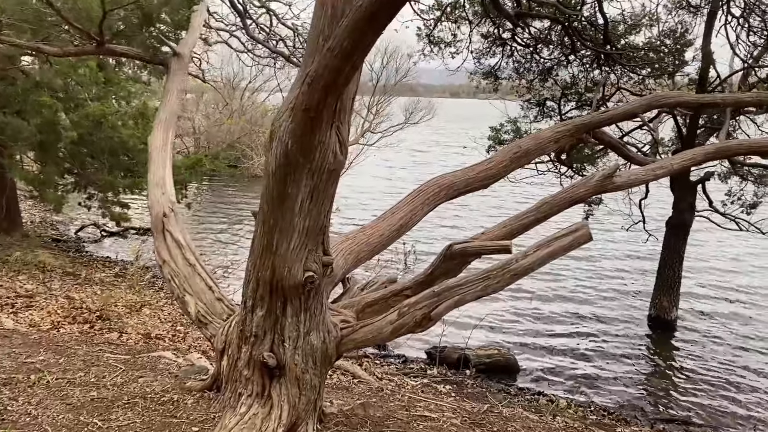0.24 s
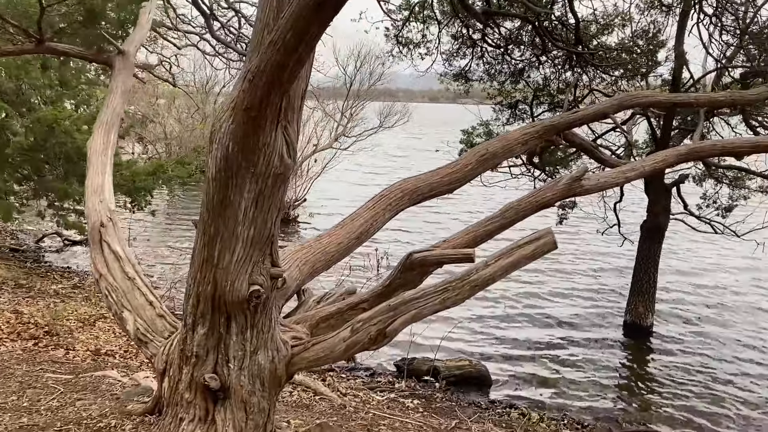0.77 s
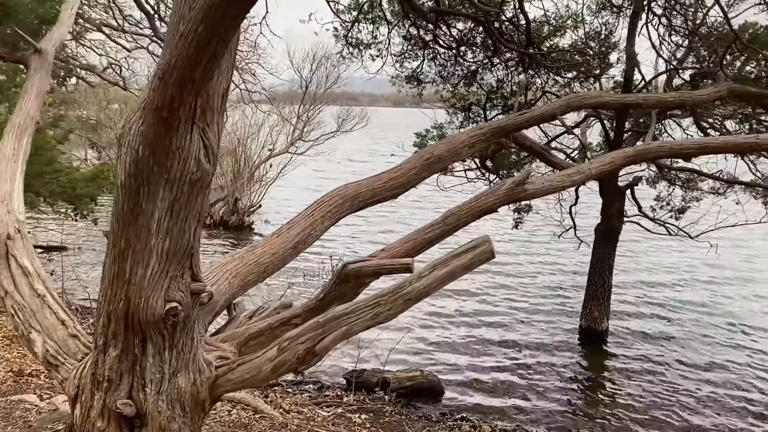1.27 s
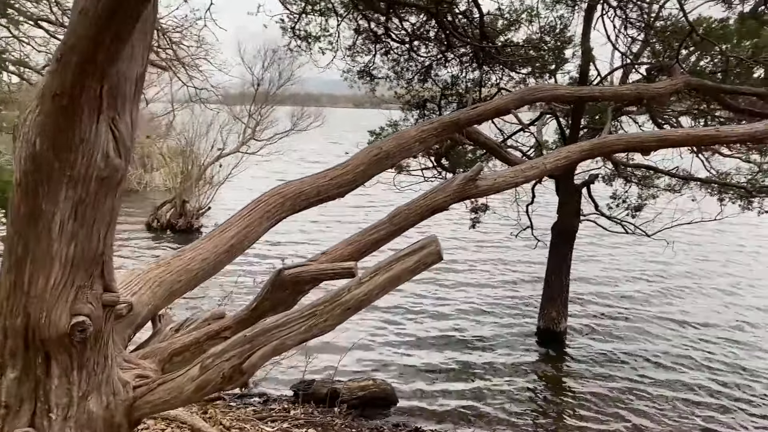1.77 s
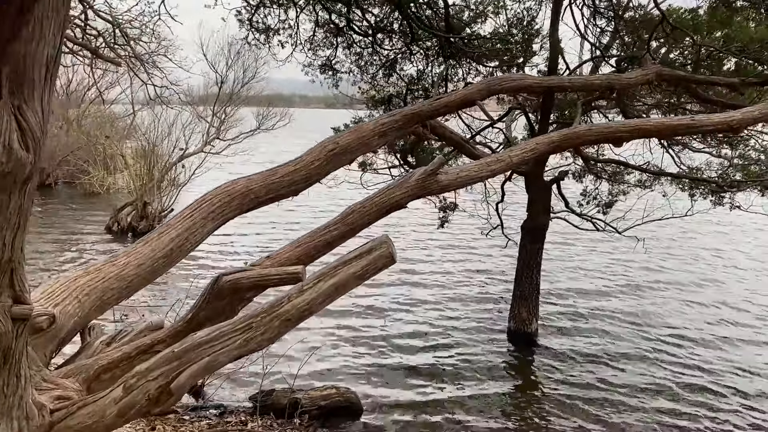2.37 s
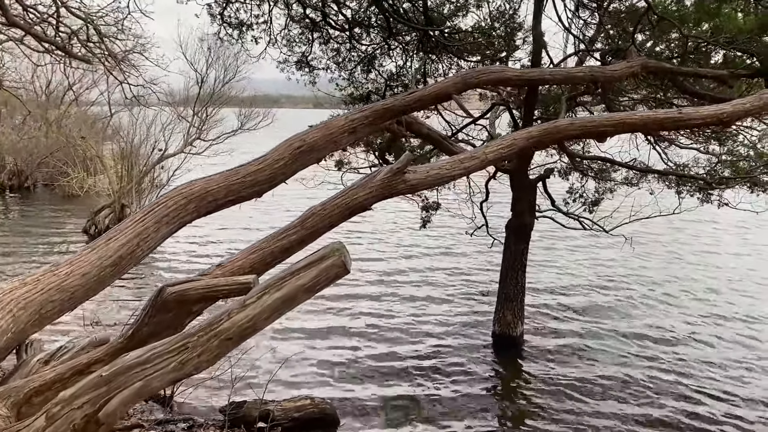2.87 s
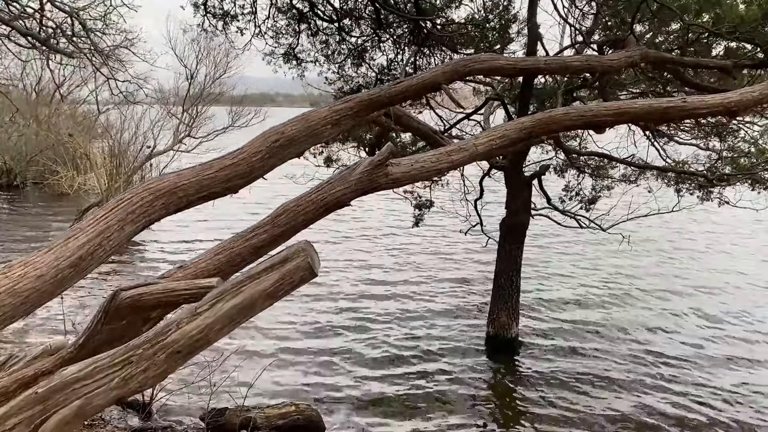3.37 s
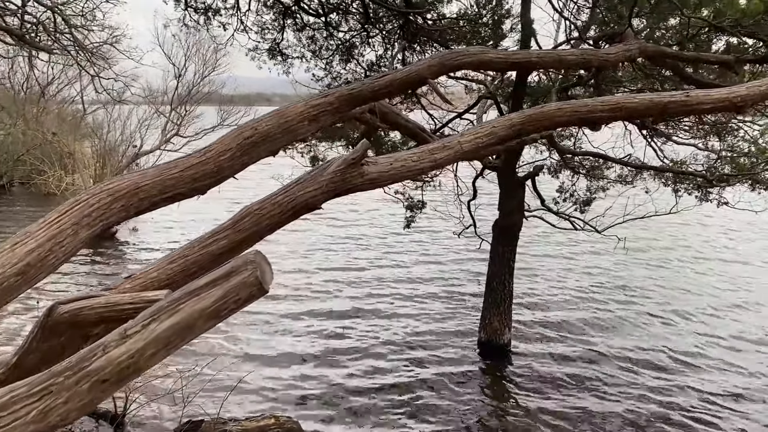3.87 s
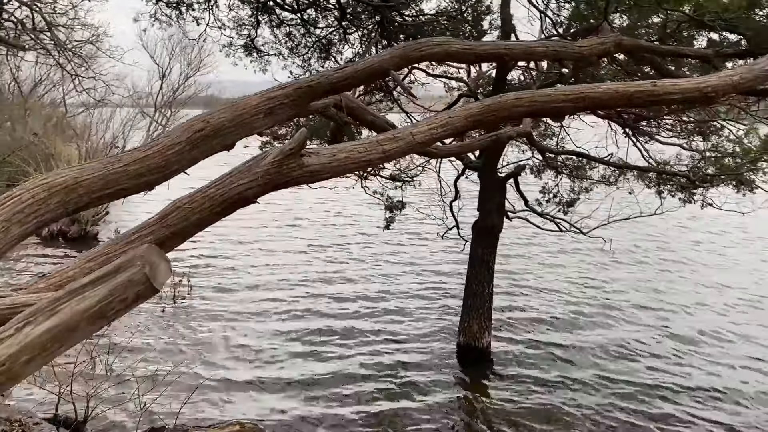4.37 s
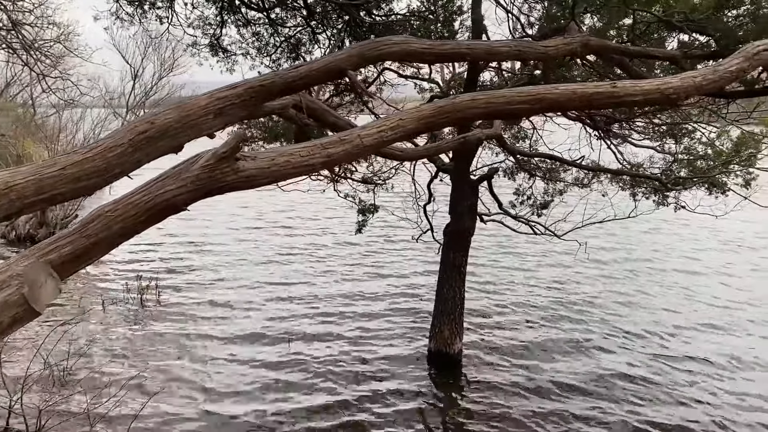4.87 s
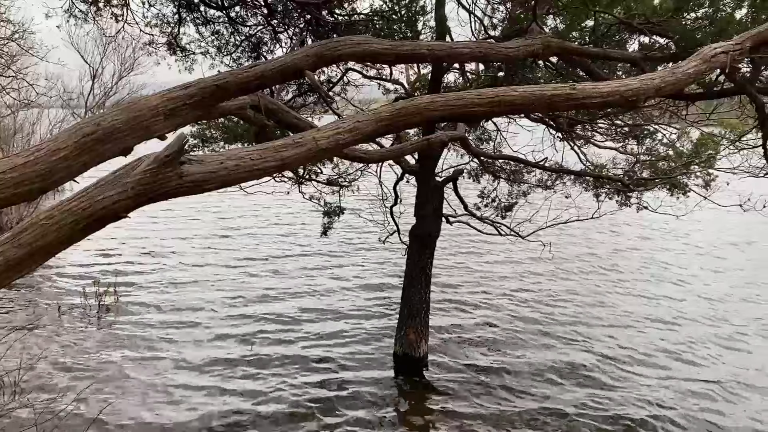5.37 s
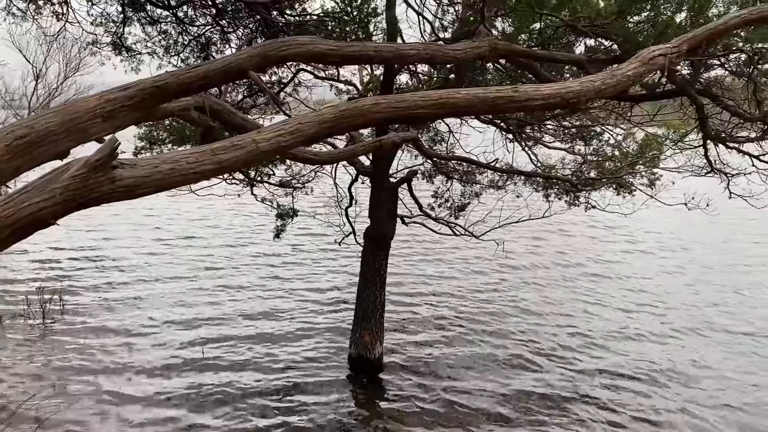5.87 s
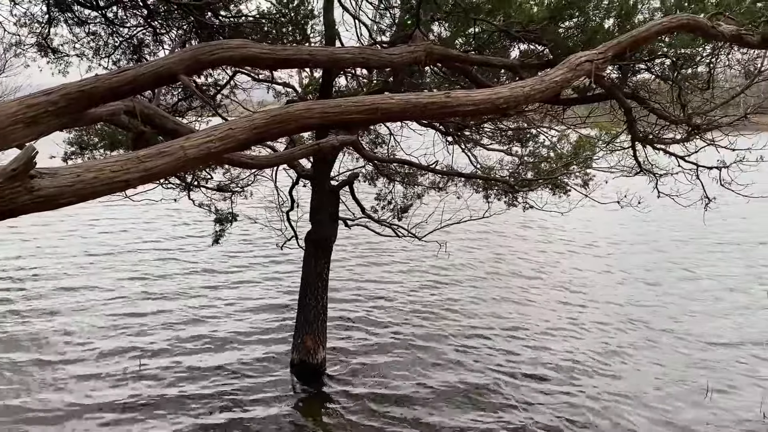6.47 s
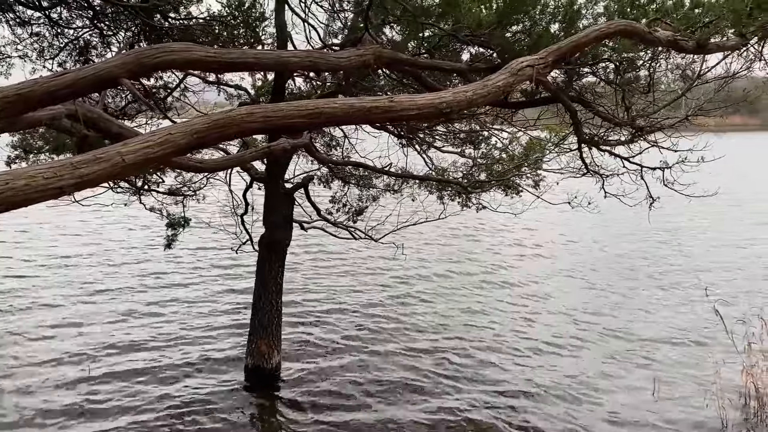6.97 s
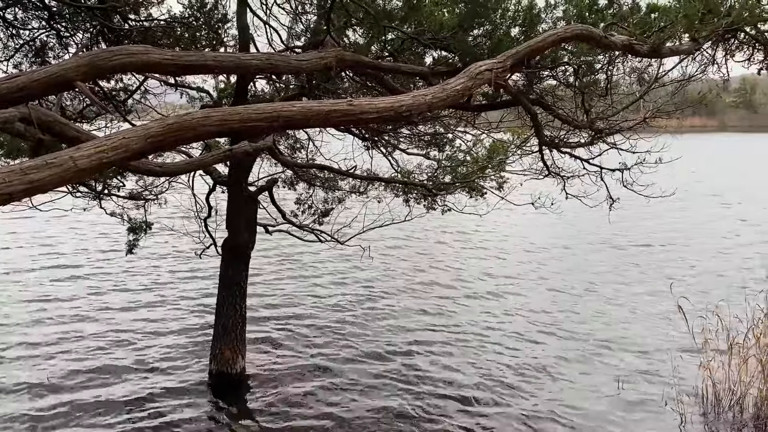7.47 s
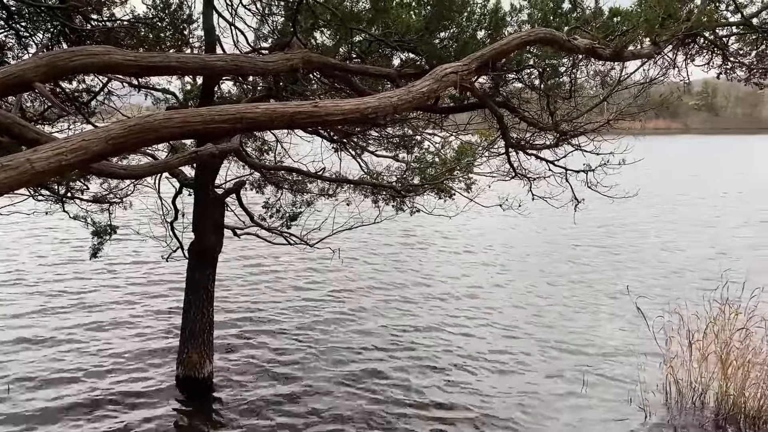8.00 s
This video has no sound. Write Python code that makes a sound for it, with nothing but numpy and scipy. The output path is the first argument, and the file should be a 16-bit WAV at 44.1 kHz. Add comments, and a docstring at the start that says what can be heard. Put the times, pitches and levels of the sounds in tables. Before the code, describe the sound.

Small songbirds sing on a lake shore for the whole eight seconds or so. High whistles, quick rising notes and falling chips overlap with a short woodland echo, above a blurred distant chorus and a soft, steady hiss of leaves and ripples. From about 0.6 to 1.9 seconds, gusts buffet the microphone with low rumbles, thuds and puffs, the loudest sounds here, peaking near 1.5 seconds. Dry leaves and twigs crackle lightly in the first two seconds, then again around 4 to 5, 6.3 and 8 seconds. From about 3.5 to 5 seconds, one bird sings a louder lilting phrase four times as the wind returns, somewhat weaker. Another small gust bumps near 6 seconds. Little waves gurgle quietly at the bank now and then, mostly near 4 and 6 seconds. The birds keep chirping to the end.

```python
"""Songbirds on a lake shore. From the start, whistles, rising whips and falling chips overlap, each a near
sine from the syrinx, over a far chorus blurred by the wood and a hiss of leaves and ripples. In the first
two seconds gusts buffet the microphone ports and dry litter crackles. From about 3.5 s a louder lilt is
sung four times as the wind returns. Wavelets gurgle, most near 4 s and 6 s, and the birds sing to the end."""
import sys
import numpy as np
from scipy import signal
from scipy.fft import rfft, irfft, next_fast_len
from scipy.io import wavfile
from scipy.ndimage import uniform_filter1d

SR = 44100
rng = np.random.default_rng(int(sys.argv[2]) if len(sys.argv) > 2 else 0)


def log_audio(samples):
    """Write samples as a 16-bit WAV file to the path given in sys.argv[1]."""
    # one column per channel
    frames = np.atleast_2d(samples).T
    # limit to full scale, then quantise
    limited = np.clip(frames, -1, 1)
    pcm = np.round(limited * 32767).astype(np.int16)
    wavfile.write(sys.argv[1], SR, pcm)


N = 363384

# Kinds of note: crest_fraction (of the length), sag_db (per note length), hook_hz, hook_fade_db
NOTE_KINDS = {"whistle": (0.42, 10, 27, 0), "slide": (0.8, 15, 28, 0), "whip": (0.83, 22, 0, 0),
              "chip": (0.58, 19, 1250, 6), "soft chip": (0.6, 18, 700, 13)}
# Song phrases, note by note; time and level are relative to the cue, and pan is left minus right:
# offset_s, length_s, first_hz, mid_hz, last_hz, level_db, pan_db, kind
SLUR = [(-.044, .013, 1420, 1760, 2050, -4.5, -18, "whip"),
        (-.032, .029, 2070, 2080, 1950, -3.5, -11, "whistle"),
        (.001, .05, 1920, 1800, 1700, 4.5, -6, "whistle"),
        (.057, .118, 1680, 1520, 1380, -2.5, -4.5, "whistle")]
TUNE = [(.001, .044, 3120, 2960, 2780, 4.5, 3, "whistle"), (.085, .03, 3610, 3570, 3550, 3.5, 3, "whistle"),
        (.141, .045, 2470, 2380, 2290, 2.5, 6, "whistle"),
        (.191, .043, 2340, 2460, 2510, 4, 4.5, "whistle"),
        (.253, .023, 2540, 2510, 2460, -2.5, 4, "whistle")]
LILT = [(-.125, .05, 2330, 2250, 2100, -14, 8, "whistle"),
        (-.074, .031, 2150, 1940, 1780, -8, 2, "whistle"), (.002, .041, 2350, 2430, 2600, -3, 5, "whistle"),
        (.043, .032, 2790, 2810, 2740, -8, 1, "whistle"), (.093, .012, 3140, 3800, 4650, -18, 3, "whip"),
        (.109, .017, 3300, 3040, 2930, -9.5, 4.5, "whistle"),
        (.151, .021, 2630, 2840, 2940, -3.5, 6, "whistle"), (.177, .052, 4120, 3900, 3380, -5, 4, "slide")]
PHRASES = {"slur": SLUR, "slur cut short": SLUR[:3], "tune": TUNE, "tune cut short": TUNE[:2],
           "lilt": LILT, "end of lilt": LILT[6:],
           "drop": [(-.003, .048, 4280, 3760, 3450, 0, 1.5, "slide")],
           "quick whip and chip": [(-.045, .026, 1950, 2650, 3350, -6, -1.5, "whip"),
           (0, .014, 4600, 4350, 4120, 0, 4, "soft chip")],
           "whip and faint chip": [(-.026, .026, 1600, 2550, 3450, 0, 1, "whip"),
           (.02, .018, 4550, 4350, 4200, -17, 2.5, "soft chip")],
           "low whip": [(-.031, .031, 1500, 2200, 2950, 0, -3.5, "whip")],
           "whip and chip": [(-.044, .027, 1600, 2500, 3420, 0.5, 7, "whip"),
           (-.001, .024, 4420, 4290, 3850, 2, .6, "chip")],
           "whip and deep chip": [(-.044, .027, 1600, 2450, 3300, 0.5, 6, "whip"),
           (-.001, .024, 4500, 4100, 3550, 3, -1.2, "chip")],
           "whip and low chip": [(-.044, .027, 1600, 2450, 3200, 0, 6, "whip"),
           (-.001, .024, 4150, 3900, 3550, 4, -1, "chip")],
           "long slide": [(0, .2, 3500, 3050, 2620, 0, 4, "slide")],
           "shallow slide": [(0, .19, 3450, 3220, 2850, 0, 5, "slide")],
           "short slide": [(0, .115, 3330, 2980, 2740, 0, -1, "slide")],
           "late whip and chip": [(-.042, .026, 1800, 2500, 3280, -3, 1.5, "whip"),
           (0, .016, 4500, 4350, 4200, 1, 4, "soft chip")],
           "steep drop": [(0, .024, 4150, 3800, 3400, 0, 2.5, "slide"),
           (.026, .035, 3300, 3200, 3150, -5, -1.5, "whistle")]}
# When each phrase is sung: cue_s, level_db
PHRASE_CUES = {"slur": [(.959, -51.5), (1.411, -52), (1.856, -52.5), (2.288, -52.5), (7.291, -52.5),
               (7.753, -53.5)], "slur cut short": [(.285, -52), (.608, -53), (6.059, -64.5), (6.63, -57),
               (6.953, -52.5), (8.202, -54)], "tune": [(-.009, -47), (.462, -49), (7.27, -49),
               (7.738, -45.5)], "tune cut short": [(.96, -48.5), (8.206, -46.5)], "lilt": [(3.576, -41.5),
               (3.965, -41), (4.354, -41.5), (4.745, -39.5)], "end of lilt": [(3.177, -47)],
               "drop": [(.4, -44), (.751, -45), (.93, -50.5), (6.162, -48), (6.728, -47), (7.083, -45)],
               "steep drop": [(7.54, -45), (7.72, -46), (8.112, -50.5), (8.188, -44.5)],
               "quick whip and chip": [(0.0682, -55), (0.1825, -53.5), (0.2992, -53), (0.4229, -47.5),
               (0.5432, -51), (0.6609, -53), (0.7776, -52), (0.8969, -47), (1.0166, -51.5), (1.1323, -52.5),
               (1.2491, -51), (1.3668, -51.5), (1.482, -52), (1.5953, -53.5), (1.7145, -52.5),
               (1.8302, -56), (1.95, -52.5), (2.0657, -57), (2.1889, -54.5), (2.3092, -56), (2.4448, -56)],
               "whip and faint chip": [(2.357, -52.5), (2.482, -49), (2.612, -48), (2.748, -47.5),
               (2.877, -49.5), (3.008, -53.5), (3.139, -49.5), (3.27, -48), (3.406, -44), (3.536, -48),
               (3.665, -47), (3.797, -45), (3.932, -48.5), (4.072, -44), (4.205, -44.5), (4.341, -46),
               (4.482, -42), (4.618, -46)], "low whip": [(4.762, -53), (4.905, -47), (5.047, -48),
               (5.192, -48.5), (5.335, -46), (5.483, -46.5), (5.628, -47.5), (5.779, -48.5), (5.932, -46.5),
               (6.124, -44), (6.305, -47.5), (6.493, -42.5), (6.685, -48.5), (6.872, -46.5), (6.997, -66)],
               "whip and chip": [(5.0484, -55), (5.1771, -52), (5.3044, -53), (5.4335, -54),
               (5.5614, -53.5), (5.6874, -50.5)], "whip and deep chip": [(5.8154, -52), (6.2103, -50),
               (6.6079, -49.5), (6.7411, -50), (6.8778, -49), (7.005, -51), (7.235, -50.5), (7.7293, -55)],
               "whip and low chip": [(5.9449, -49), (6.0786, -47), (6.341, -47.5), (6.4757, -45.5),
               (7.3507, -53)], "long slide": [(6.125, -51.5)], "shallow slide": [(1.43, -51)],
               "short slide": [(5.272, -51.5)], "late whip and chip": [(6.4308, -50.5), (6.5425, -50),
               (6.6568, -52), (6.777, -56), (7.1192, -54), (7.4629, -50.5), (7.5772, -57), (7.6934, -53),
               (7.8062, -57.5), (7.9164, -51), (8.0396, -54), (8.1469, -53.5)]}
# Lone slurred whistles: start_s, length_s, first_hz, mid_hz, last_hz, level_db, pan_db
WHISTLES = [(.236, .02, 3050, 2750, 2450, -50, 4), (.39, .015, 2300, 3000, 3550, -54.5, 5),
            (.451, .021, 3710, 3630, 3400, -42, 2), (.563, .029, 1920, 2090, 2060, -57.5, -8),
            (.705, .016, 3110, 2880, 2620, -53, 3), (.769, .013, 2210, 1860, 1610, -55.5, -1),
            (.786, .115, 1570, 1790, 2340, -60.5, -3), (1.031, .064, 2410, 2370, 2340, -58.5, 0),
            (1.21, .011, 3640, 3590, 3510, -54.5, 1), (1.224, .044, 3320, 3230, 3140, -51.5, 1),
            (1.328, .037, 2450, 2280, 2250, -58.5, -8), (1.673, .04, 3320, 3260, 3100, -55, 3),
            (1.685, .033, 2450, 2400, 2320, -49.5, -1), (1.72, .1, 2240, 2080, 1950, -57, -1),
            (2.107, .051, 3320, 3280, 3100, -54, 7), (2.154, .022, 3980, 3950, 3880, -57, 0),
            (2.2, .045, 2300, 2130, 1950, -56, -1), (2.544, .057, 3470, 3280, 3120, -58, 1),
            (2.663, .045, 2260, 2430, 2640, -56.5, -3), (2.717, .017, 3940, 3910, 3810, -58.5, 0),
            (2.765, .048, 2700, 2330, 2100, -54, 0), (2.843, .101, 1860, 1810, 1730, -59.5, -6),
            (2.951, .13, 1710, 1570, 1420, -67, -6), (2.896, .024, 3140, 3010, 2810, -57.5, 0),
            (2.941, .054, 2440, 2540, 2640, -59.5, 0), (3.053, .031, 3140, 3130, 3090, -56.5, 5),
            (3.076, .044, 2390, 2290, 2180, -59, 0), (3.14, .375, 4350, 3520, 2800, -52.5, 0),
            (3.39, .11, 2450, 2250, 2080, -57, -1), (3.5, .12, 3400, 3200, 2900, -59, 1),
            (3.96, .15, 1800, 1920, 2100, -58, -4), (4.09, .32, 4100, 3500, 2650, -50.5, 1),
            (4.424, .24, 2630, 2170, 1800, -54.5, -4), (4.64, .11, 1870, 1840, 1760, -54.5, 1),
            (5.124, .084, 2640, 2420, 2260, -59.5, 3), (5.165, .07, 1720, 1990, 2110, -59, -4),
            (5.494, .031, 2330, 2480, 2690, -58, 0), (5.512, .1, 1720, 1760, 2000, -61, 0),
            (5.968, .06, 2900, 2600, 2250, -56, 0), (6.031, .079, 2160, 1860, 1730, -56.5, -4),
            (6.128, .04, 1900, 2200, 2500, -60, -5), (6.55, .06, 2400, 2330, 2160, -52.5, -2),
            (6.805, .07, 1300, 1750, 2500, -59, -4), (6.912, .022, 2200, 2120, 2000, -53, -6),
            (7.125, .022, 3500, 3380, 3270, -52, -1), (7.516, .013, 3240, 2910, 2610, -52.5, 2),
            (7.577, .017, 2090, 1890, 1620, -50, -1), (7.6, .032, 1590, 1620, 1670, -57, -7),
            (8.001, .053, 3580, 3310, 3110, -52, -1), (8.043, .02, 2150, 1870, 1680, -51, 0),
            (8.073, .05, 1590, 1630, 1700, -57.5, -3)]
# Strength of the wind: time_s, rumble_db, flutter_db
WIND_LEVELS = [(0, -42.5, -56.5), (.35, -56.5, -61.5), (.8, -37.5, -63), (1.1, -47.5, -68),
               (1.45, -30, -56), (1.8, -47, -55), (2.1, -51.5, -65), (2.6, -55, -62), (2.9, -48.5, -68),
               (3.45, -49, -50.5), (3.9, -56.5, -53.5), (4.25, -44.5, -49.5), (4.5, -47, -41),
               (4.7, -39, -48.5), (5.1, -48.5, -57.5), (5.8, -48, -51), (6.3, -51, -54), (6.8, -50, -63),
               (7.5, -49, -58), (8.0, -50.5, -66), (8.24, -46, -43)]
# Single eddies that thud on the ports: start_s, level_db, pitch_hz
THUDS = [(0.625, -34, 69), (0.811, -21.5, 64.8), (0.866, -20, 75), (1.014, -26, 69.6), (1.17, -18.5, 64),
         (1.401, -18.5, 85), (1.459, -18, 111), (1.628, -25, 87), (2.792, -39, 75.6), (3.006, -32.5, 86),
         (3.597, -25.5, 94), (3.736, -32.5, 75), (4.396, -28, 103), (4.499, -26.5, 75),
         (4.584, -34.5, 71.6), (4.695, -30, 78), (4.767, -27, 83), (4.87, -32.5, 73), (5.803, -43, 158),
         (5.815, -33, 74), (6.175, -35, 92.6), (8.224, -36, 123)]
# Sharp puffs on the ports: start_s, level_db, pitch_hz
PUFFS = [(1.409, -30, 250), (1.574, -22, 383), (1.438, -35.5, 265), (1.596, -27.5, 890), (1.551, -42, 606),
         (1.612, -31, 900), (1.67, -43, 910), (1.714, -36, 253.6), (1.728, -40, 603), (1.821, -34, 450),
         (1.838, -34.5, 253), (1.746, -30, 815), (1.756, -35, 347), (1.786, -32, 472), (1.804, -32.5, 267),
         (1.848, -27, 284), (1.88, -26.5, 292), (3.428, -37.5, 226), (3.593, -28.5, 270), (3.604, -46, 450),
         (3.971, -37, 325), (5.801, -37, 336), (5.81, -40, 447)]
# Loudest snaps of the litter, before the band gains: start_s, crack_db, body_offset_db, knock_offset_db
SNAPS = [(0.2975, -49.5, 5.5, 6), (0.3224, -48, -10, -6), (0.374, -61, -3, -11), (0.7122, -55, -29, 8.5),
         (0.739, -57, -23, -3), (0.765, -56, -16, -19), (1.1089, -77, -1, 13), (1.5144, -66, -9, 1),
         (1.571, -76, 3, 16.5), (1.665, -60, -10, 2), (1.6734, -68, 6, -4), (1.6832, -57, 3, -4),
         (1.717, -59, -9, 8), (1.725, -38.5, -22, -25), (1.7356, -66, -6, 5), (1.746, -67, -5, 2),
         (2.002, -78, -2, 12), (2.1108, -67, -12, 12.5), (2.2094, -60, -12, -13), (2.792, -74, -1, 10),
         (3.312, -67, -2, 12), (3.3252, -62.5, 3, 9.5), (3.9709, -48, -22, -19), (4.021, -51, -18, -23),
         (4.085, -71, -7, -2), (4.134, -72, 5, -4), (4.1872, -59.5, -13, 8.5), (4.6303, -71, -2, -10),
         (4.6453, -62, -3, -7), (4.7217, -71, -4, -5), (4.7448, -49, -9, -22), (4.7768, -57, -3, -9),
         (4.804, -48.5, -13, -3), (4.9174, -60, -17, -4), (4.9484, -69, 3, 7), (4.9931, -69, 8, 7),
         (5.4845, -71, 5, -2), (5.5675, -62, -14, 0), (6.2492, -53, -21, -16), (6.2884, -63, -1, -14),
         (6.2963, -63, -6, -11), (6.357, -64, -6, 8), (6.573, -64, -5, -9), (6.872, -75, 4, 2),
         (7.676, -67, 4, 10), (7.939, -52.5, -17, 4), (8.0053, -53, -17, 1), (8.141, -79, 15, 9),
         (8.149, -80, 15, 8)]
# Swarms of small crackles, before the band gains: start_s, length_s, level_db
CRUNCHES = [(0.292, 0.04, -54.5), (0.645, 0.13, -63), (1.223, 0.1, -66), (1.665, 0.081, -63),
            (3.306, .04, -66), (3.96, 0.3, -66), (4.635, 0.3, -64.5), (5.486, 0.39, -75.5),
            (6.228, 0.19, -60.5), (7.67, 0.033, -67), (7.923, 0.062, -59), (8.135, 0.03, -68)]
# Bands in which the crackles ring: low_hz, high_hz, relative_db
GRAIN_BANDS = [(4230, 6000, 5), (6300, 8300, 3), (10100, 12500, 1.5), (13200, 15000, 3.5)]
# Bubbles in the wavelets at the bank: start_s, level_db, pitch_hz
GURGLES = [(0.672, -43, 865), (1.654, -42.5, 738), (2.449, -44.5, 887), (4.067, -50.5, 1033),
           (4.177, -48, 900), (4.2, -47.5, 1070), (4.249, -51, 910), (4.853, -50, 690), (6.233, -52.5, 920),
           (6.32, -49, 960), (6.37, -49.5, 950), (6.405, -43, 730), (6.426, -52, 1080)]
# Strength of the far chorus: time_s, level_db
CHORUS_LEVELS = [(0, -56), (1, -55.5), (2, -54), (3, -65), (4, -63.5), (5, -55), (6, -68.5), (6.5, -54),
                 (7, -54.5), (7.6, -55), (8.24, -53)]
# Spectral density of the hiss of leaves and ripples: frequency_hz, relative_db
HISS_SPECTRUM = [(150, 1.5), (300, -0.5), (600, -0.5), (1000, -4.5), (1400, -8.5), (2500, 4.5), (4200, -20),
                 (5500, -18.5), (8000, -25.5), (11500, -27), (13500, -32), (15800, -40.5)]
# Phase by which the left port leads the right: frequency_hz, lead_rad
PORT_PHASE = [(0, 0), (400, -.9), (860, 1.3), (3200, .8), (7150, 0), (9000, -3.2), (13200, -9.4),
              (16500, -13.5)]

HOOK_S, EDGE_S, OVERTONE_DB = .0026, .00276, -36  # note: hook decay, attack and release, fourth partial
BOUNCE_S, BOUNCE_DB = .007, -12  # first reflection: mean delay, gain
WOOD_T60_S, WOOD_DB = .46, -2
SNAP_S, SNAP_TAIL_S, SNAP_TAIL_DB = .001, .012, -8
GRAINS_PER_S, GRAIN_S, RUSTLE_DB, CRUNCH_FADE_S = 350, .0011, -24.5, .033
WIND_SIDE_DB, HISS_SIDE_DB, HISS_DB = -9.5, -2, -60.5
CUTOFF_HZ = 15800


def near_birds():
    """Multipath propagation: a note arrives directly, off the ground or a trunk, then as reverberation."""
    out, notes = np.zeros((2, N)), song_notes()
    wavers, delays = rng.standard_normal((len(notes), 40)), BOUNCE_S * (.5 + rng.random(len(notes)))
    for (start_s, pan_db, *sung), waver, delay_s in zip(notes, wavers, delays):
        sound = syrinx_note(*sung, waver)
        add(out, max(start_s - .002, 0), sound, pan_db)
        bounce_s = min(max(start_s, 0) + delay_s, (N - 1) / SR)
        add(out, bounce_s, undb(BOUNCE_DB) * sound, pan_db + 3 * waver[0])
    scattered = band(out, 1500, 9000, order=1)  # low notes scatter less
    return out + undb(WOOD_DB) * wood_echo(scattered, WOOD_T60_S)


def syrinx_note(length_s, first_hz, mid_hz, last_hz, level_db, crest, sag_db, hook_hz, hook_fade_db, waver):
    """Frequency and amplitude modulation: a near sine glides on an arc as its level crests and sags."""
    u = np.linspace(0, 1, int((length_s + EDGE_S) * SR))
    t = u * (length_s + EDGE_S)
    knots = np.arange(len(waver))
    arc_hz = first_hz * (1 - u) * (1 - 2 * u) + 4 * mid_hz * u * (1 - u) + last_hz * u * (2 * u - 1)
    hook = np.exp(-t / HOOK_S)  # the pitch drops in from above
    tremble = .0083 * min(1, .018 / length_s) * np.interp(t, knots * .00251, waver[::-1], period=.1)
    phase = 2 * np.pi * np.cumsum(arc_hz * (1 + tremble) + hook_hz * hook) / SR
    edges = np.sin(np.pi / 2 * np.clip(np.minimum(t, t[::-1]) / EDGE_S, 0, 1)) ** 2
    waver_db = 2.85 * np.interp(t, knots * .00864, waver)
    waver_db += 2.07 * np.interp(t, knots * .0021, waver[::-1], period=.084)
    envelope = edges * undb(level_db - sag_db * abs(u - crest) + waver_db - hook_fade_db * hook)
    overtone = undb(OVERTONE_DB) * (arc_hz < 2100) * np.sin(4 * phase)  # low pitches only
    return np.sqrt(2) * envelope * (np.sin(phase) + overtone)


def song_notes():
    """Song as a sequence of notes: the phrases at their cues, then the lone whistles."""
    notes = [(cue_s + offset_s, pan_db, *contour, cue_db + db, *NOTE_KINDS[kind])
             for name, cues in PHRASE_CUES.items()
             for cue_s, cue_db in cues
             for offset_s, *contour, db, pan_db, kind in PHRASES[name]]
    notes += [(start_s, pan_db, *contour, db, *NOTE_KINDS["whistle"])
              for start_s, *contour, db, pan_db in WHISTLES]
    return [note for note in notes if note[0] < N / SR]


def wood_echo(x, t60_s):
    """Scattering by trunks: echoes decay exponentially, with a different set reaching each side."""
    t = np.arange(SR) / SR
    trunks = 1 + 7 * (rng.random((2, SR)) < 60 / SR)  # a few echoes stand out
    envelope = np.exp(-np.log(1000) * t / t60_s) * np.clip(t / .0015, 0, 1)
    echoes = rng.standard_normal((2, SR)) * trunks * envelope
    return signal.fftconvolve(x, echoes / np.sqrt(np.sum(echoes ** 2) / 2), axes=1)[:, :N]


def wind():
    """Turbulent pressure: eddies push on the ports as a throbbing rumble, a flutter, thuds and puffs."""
    rumble_db, flutter_db = curves(WIND_LEVELS)
    throb = wander(17)
    rumble = unit_rms(band(stereo_noise(WIND_SIDE_DB), 44.2, 88)) * undb(rumble_db + 3.33 * throb)
    flutter = unit_rms(band(stereo_noise(WIND_SIDE_DB), 53.4, 181.5, order=3))
    flutter *= undb(flutter_db + 3.5 * throb + 5.9 * wander(35))
    thuds = tone_pulses(THUDS, cycles=1.93, glide=.0031, gain_db=.052)
    puffs = tone_pulses(PUFFS, cycles=.68, glide=.0034, gain_db=.12)
    return rumble + flutter + thuds + band(puffs, 85, 890)


def litter():
    """Brittle fracture: dry leaves and twigs give a bright crack, a duller body and a woody knock."""
    impulses = np.zeros((3, N))
    for start_s, db, body_db, knock_db in SNAPS:
        impulses[:, int(start_s * SR)] = undb([db, db + body_db, db + knock_db])
    crack, body, knock = (noise_bursts(hits, SNAP_S) + undb(SNAP_TAIL_DB) * noise_bursts(hits, SNAP_TAIL_S)
                          for hits in impulses)
    snaps = undb(15) * band(crack, 11000, 19000) + undb(29) * band(body, 4100, 7200)
    snaps += undb(31.5) * band(knock, 410, 2300, order=1)
    direct = np.tile(snaps + crunches(), (2, 1))
    return direct + undb(-8) * wood_echo(direct, t60_s=.04)


def crunches():
    """Shot noise: swarms of tiny crackles in the litter, within a soft rustle that dies away."""
    out, drive = np.zeros((2, N))
    for start_s, length_s, db in CRUNCHES:
        drive[int(start_s * SR):int((start_s + length_s) * SR)] += undb(db)
    decay = np.exp(-1 / (CRUNCH_FADE_S * SR))
    envelope = signal.lfilter([1 - decay], [1, -decay], drive) * undb(5.1 * wander(25))
    for low_hz, high_hz, db in GRAIN_BANDS:
        grains = (rng.random(N) < GRAINS_PER_S / SR) * rng.laplace(size=N)
        rustle = undb(RUSTLE_DB) * rng.standard_normal(N)
        out += undb(db + 10.5) * band(envelope * (noise_bursts(grains, GRAIN_S) + rustle), low_hz, high_hz)
    return out


def wavelets():
    """Bubble resonance: each plop is a short rising tone within a broad splash."""
    bubbles = tone_pulses(GURGLES, cycles=6, glide=.05, gain_db=.1)
    splash = band(stereo_noise(-12.5), 524, 1500) * uniform_filter1d(abs(bubbles), int(.036 * SR))
    return bubbles + undb(20.5) * splash


def far_birds(count=1300):
    """A diffuse field: distant birds sing the same notes at random times and pitches, mostly as echo."""
    out, notes = np.zeros((2, N)), song_notes()
    chances, wavers = rng.random((count, 5)), rng.standard_normal((count, 40))
    for (when, which, pitch, distance, side), waver in zip(chances, wavers):
        _, _, length_s, first_hz, mid_hz, last_hz, _, *manner = notes[int(which * len(notes))]
        pitches_hz = np.array([first_hz, mid_hz, last_hz]) * (1 + .16 * (pitch - .5))
        # air and leaves dull the high notes; the lowest and the long slurs carry poorly
        loss_db = 14 * max(mid_hz / 1000 - 3.1, 0) + 16 * max(2.1 - mid_hz / 1000, 0) + 160 * length_s
        sound = syrinx_note(length_s, *pitches_hz, -6 * distance - loss_db, *manner, waver)
        add(out, when * N / SR, sound, pan_db=8 * (side - .5))
    blurred = out + undb(2.5) * wood_echo(out, t60_s=.55)
    return unit_rms(blurred) * undb(curves(CHORUS_LEVELS)[0])


def shore_hiss():
    """Incoherent sources: leaves and ripples sum to a soft, almost steady coloured noise."""
    hz, db = np.transpose(HISS_SPECTRUM)
    bins_hz = np.arange(N // 2 + 1) * SR / N + 1
    colour = undb(np.interp(np.log(bins_hz), np.log(hz), db))
    hiss = irfft(rfft(stereo_noise(HISS_SIDE_DB)) * colour, N)
    return unit_rms(hiss) * undb(HISS_DB + .12 * wander(1))


def tone_pulses(table, cycles, glide, gain_db):
    """Damped oscillation: each tone swells and fades within a few cycles while its pitch glides up."""
    out = np.zeros((2, N))
    for (start_s, db, hz), side in zip(table, rng.standard_normal(len(table))):
        u = np.arange(int(3 * cycles * SR / hz)) * hz / SR / cycles
        swell = 3 * u * np.exp(1 - 3 * u)
        tone = np.sin(2 * np.pi * cycles * u * (1 + glide * u))
        add(out, start_s, undb(db + gain_db) * swell * tone, pan_db=2 * side)
    return out


def noise_bursts(impulses, fade_s):
    """Exponential decay: each impulse becomes a fading burst of noise of equal energy."""
    envelope = signal.lfilter([1], [1, -np.exp(-1 / (fade_s * SR))], impulses)
    return rng.standard_normal(N) * envelope * np.sqrt(2 / (fade_s * SR))


def wander(rate_hz):
    """Random modulation: linear ramps between chance values, with unit standard deviation."""
    hold = int(SR / rate_hz)
    ramps = uniform_filter1d(np.repeat(rng.standard_normal(N // hold + 1), hold), hold)[:N]
    return ramps / ramps.std()


def stereo_noise(side_db):
    """Partial coherence: one noise common to both channels plus another in antiphase."""
    mid, side = rng.standard_normal((2, N))
    return mid + undb(side_db) * side * np.array([[1], [-1]])


def add(out, start_s, sound, pan_db):
    """Amplitude panning: mix a sound in with a level difference between left and right."""
    i = int(start_s * SR)
    out[:, i:i + len(sound)] += sound[:N - i] * undb([[pan_db / 2], [-pan_db / 2]])


def band(x, low_hz, high_hz, order=2):
    """Maximally flat band-pass filtering."""
    sos = signal.butter(order, [low_hz, min(high_hz, .45 * SR)], "bandpass", fs=SR, output="sos")
    return signal.sosfilt(sos, x)


def curves(table):
    """Linear interpolation of each column against the times in the first."""
    times_s, *columns = np.transpose(table)
    return [np.interp(np.arange(N) / SR, times_s, column) for column in columns]


def undb(db):
    return 10 ** (np.asarray(db) / 20)


def unit_rms(x):
    return x / np.sqrt(np.mean(x ** 2))


def scene():
    """Superposition: the pressures of all the sources add."""
    return near_birds() + far_birds() + wind() + wavelets() + litter() + shore_hiss()


def record(dry):
    """Path difference: sound reaches the two spaced ports out of phase; a low-pass cuts the top."""
    size = next_fast_len(N + SR // 10)
    lead_rad = np.interp(np.arange(size // 2 + 1) * SR / size, *np.transpose(PORT_PHASE))
    spectrum = rfft(np.pad(dry, ((0, 0), (0, size - N)), "reflect"))
    ports = irfft(spectrum * np.exp(.5j * lead_rad * np.array([[1], [-1]])), size)[:, :N]
    return signal.sosfilt(signal.ellip(8, .2, 70, CUTOFF_HZ, fs=SR, output="sos"), ports)


dry = scene()
out = record(dry)
log_audio(out)
```